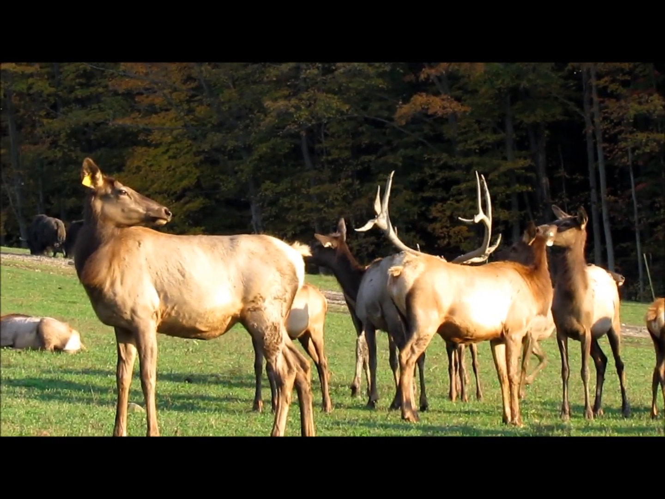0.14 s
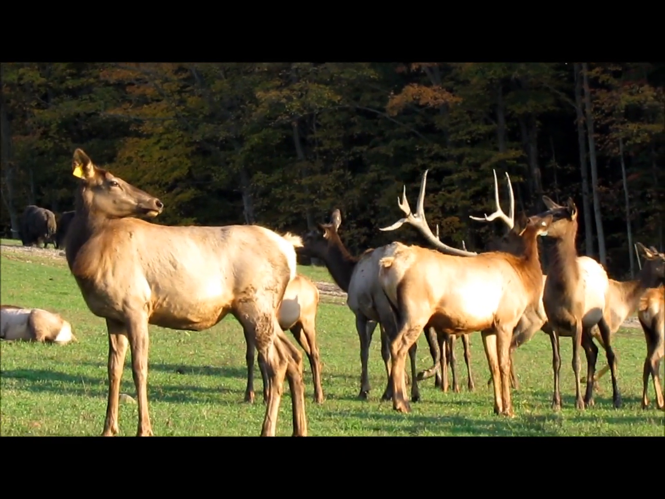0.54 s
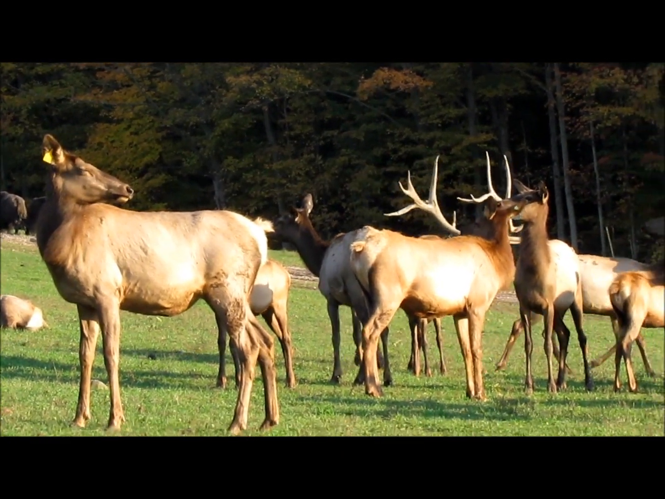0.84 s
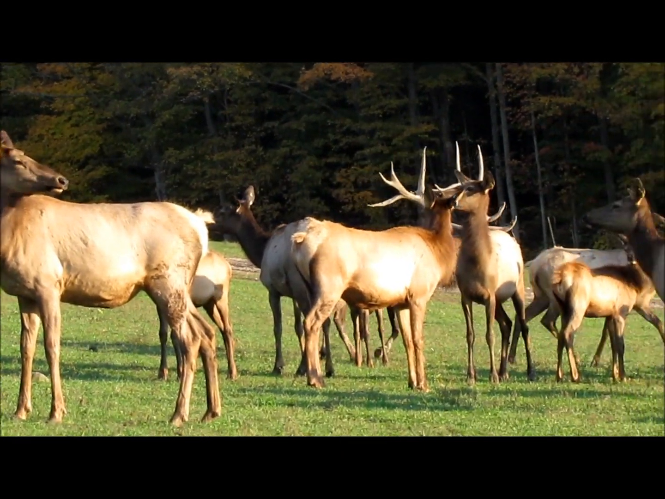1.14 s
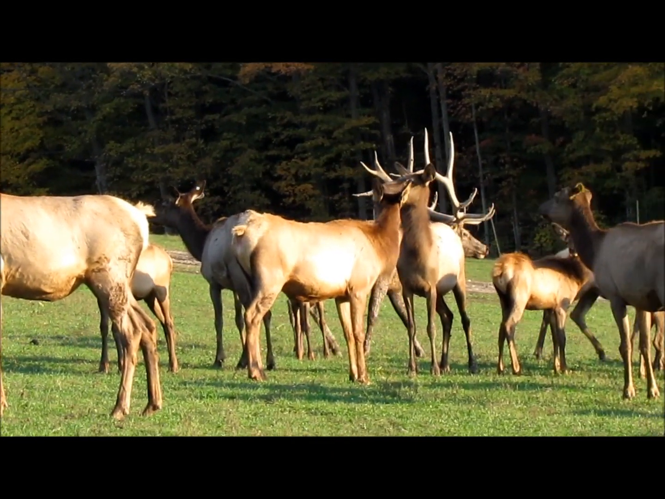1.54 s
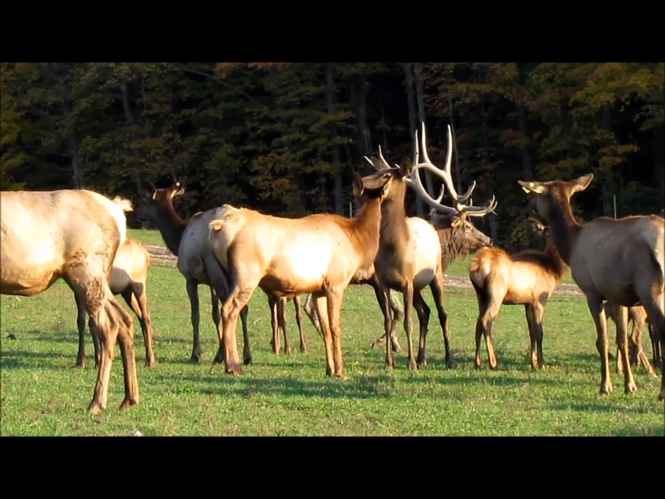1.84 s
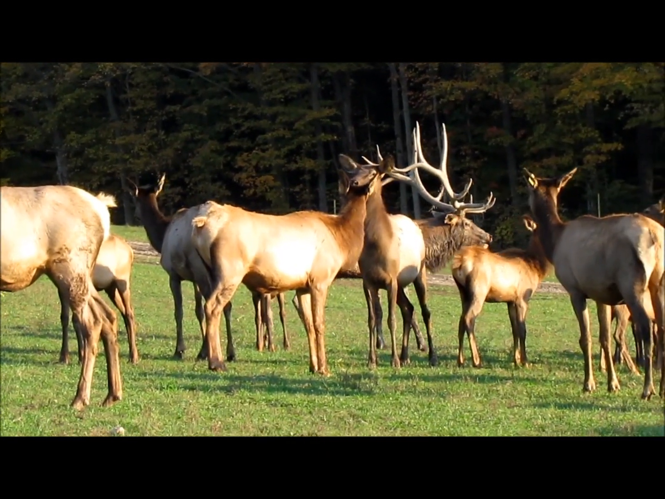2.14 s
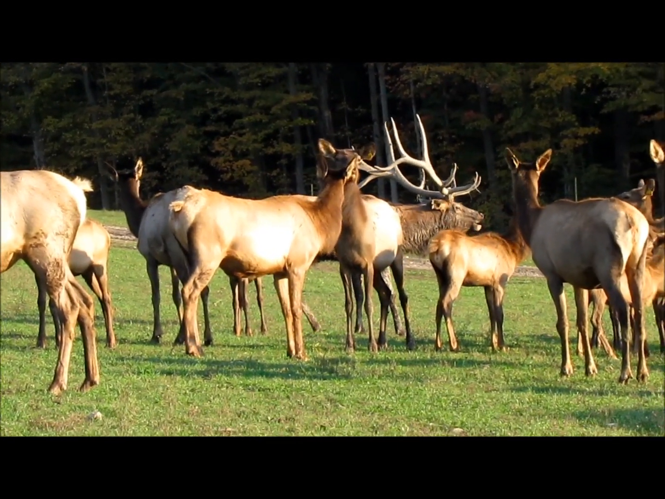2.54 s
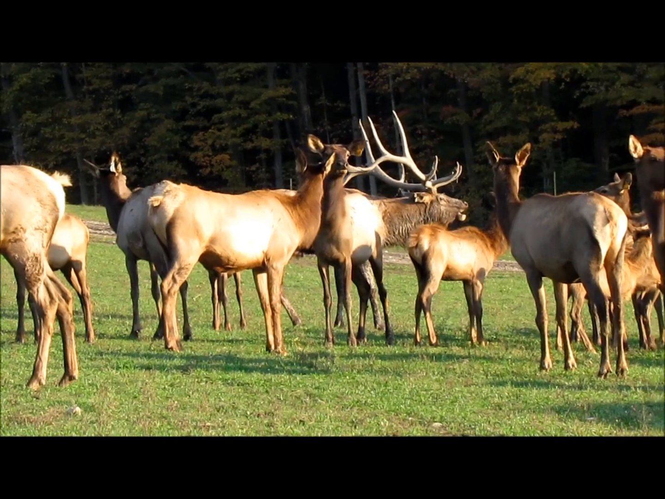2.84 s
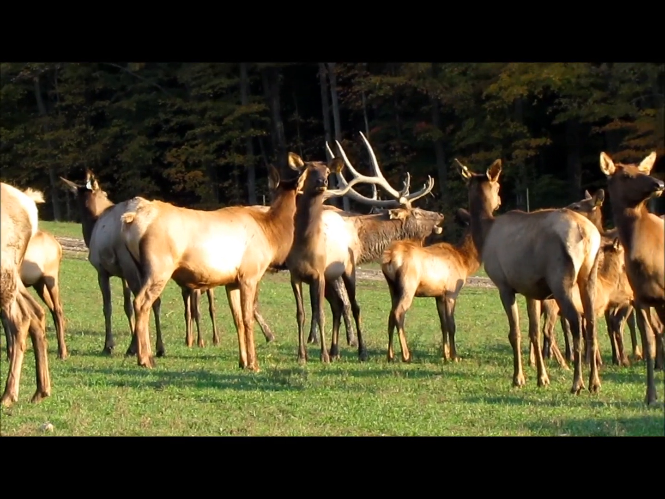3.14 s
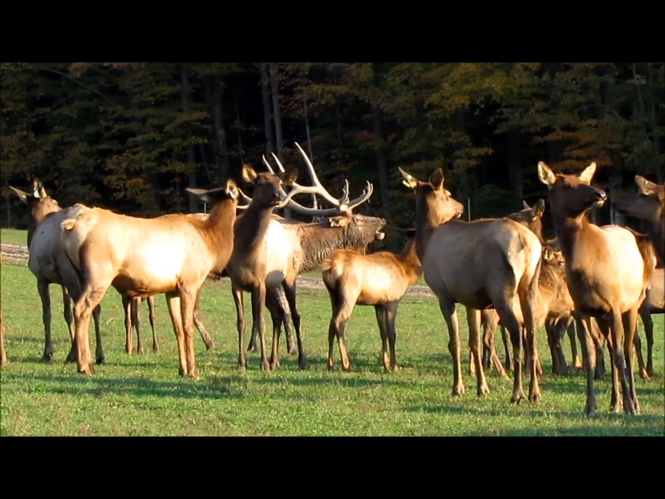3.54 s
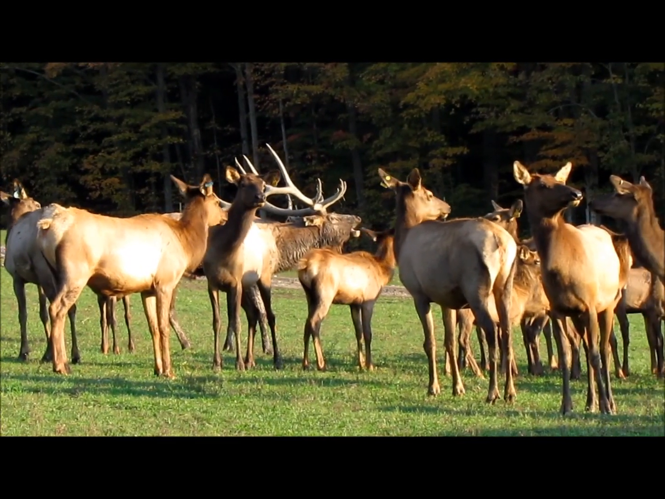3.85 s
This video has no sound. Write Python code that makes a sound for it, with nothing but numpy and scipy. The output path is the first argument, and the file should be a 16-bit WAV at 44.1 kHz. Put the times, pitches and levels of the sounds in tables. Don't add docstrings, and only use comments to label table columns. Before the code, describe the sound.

Elk bull bugling late over quiet, windy field hum, its piercing whistle breaking into a rough roar

```python
import sys
import numpy as np
from scipy import signal
from scipy.fft import rfft, irfft, next_fast_len
from scipy.io import wavfile
from scipy.ndimage import uniform_filter1d, map_coordinates

SR = 44100
rng = np.random.default_rng(int(sys.argv[2]) if len(sys.argv) > 2 else 0)


def persist_wave(psi):
    counts = np.round(np.clip(psi, -1, 1) * 32767).astype(np.int16)
    wavfile.write(sys.argv[1], SR, np.atleast_2d(counts).T)


def field_ratio(decibels):
    return 10 ** (np.asarray(decibels, dtype=float) / 20)


N = 176400
T = np.arange(N) / SR

# freq_hz, density_db
HUM_SPECTRUM = [(35, -39.5), (60, -1), (200, -13), (252, -18), (290, -21), (752, -14), (826, -20),
                (1180, -23), (2500, -41), (3250, -71.5), (5500, -120)]
# time_s, level_db
HUM_SWELL = [(0.0, -47), (1.04, -45), (1.1, -45), (1.79, -47.5), (3.99, -43), (4.0, -42.5)]
# freq_hz, likeness_0_1
HUM_LIKENESS = [(60, .6), (300, .88), (800, .87), (2000, .7)]
# freq_hz, density_db
HISS_SPECTRUM = [(880, -56), (1500, -5.5), (2730, -4), (4730, -7), (5870, -10.5), (8200, -13.5),
                 (15700, -25)]
# time_s, strength_db
WIND_STRENGTH = [(0.0, -62.5), (0.51, -52), (0.96, -60.5), (1.98, -45.5), (2.22, -58), (2.48, -48),
                 (2.68, -57), (2.81, -38), (3.06, -33), (3.1, -42), (3.21, -20.5), (3.25, -37.5),
                 (3.51, -59.5), (4.0, -52)]
# freq_hz, density_db
BUFFET_SPECTRUM = [(15, -9), (40, 2), (100, -4.5), (200, -18.5), (400, -31), (800, -70)]
# time_s, level_db, pitch_hz
THUMPS = [(1.3, -22, 98), (1.957, -23.5, 103), (2.797, -37, 105.7), (2.879, -41, 105.4), (2.949, -12.5, 96),
          (3.04, -27, 106), (3.06, -24, 103.4), (3.129, -21, 104), (3.149, -15.5, 100.7),
          (3.189, -9.5, 103), (3.209, -9.5, 109)]
# freq_hz, density_db
GRASS_SPECTRUM = [(2500, -29), (5000, -16.5), (7500, 0.5), (12000, -1), (16000, -19)]
# centre_s, spread_s, level_db
RUSTLES = [(.2, .03, -72), (.72, .03, -71), (1.01, .008, -69), (1.335, .006, -71), (1.53, .025, -69),
           (1.88, .02, -71), (2.12, .004, -66), (2.3, .04, -71), (2.635, .005, -68), (2.912, .0015, -52)]
# start_s, length_s, pitch_hz, level_db
PEEPS = [(0.385, 0.095, 8050, -64), (.47, .05, 6560, -71), (1.5, 0.043, 6870, -62)]
# time_s, pitch_hz, level_db
FAR_TONE = [(0, 705, -41), (.06, 685, -58), (.15, 668, -44), (.21, 665, -57), (.29, 663, -44),
            (.42, 665, -50.5), (.5, 660, -47), (.63, 655, -55.5), (.75, 650, -57)]
# start_s, length_s, start_hz, end_hz, level_db
FAR_CALLS = [
    (0, .1, 1450, 1450, -56),
    (.14, 0.066, 1434, 1426, -59),
    (.59, 0.074, 1460, 1430, -59),
    (1.04, 0.15, 539, 639, -45),
    (1.16, 0.24, 540, 625, -44),
    (1.44, 0.3, 572.5, 521, -51),
]
# start_s, length_s, start_hz, end_hz, level_db
GRUNT = [
    (2.5, .14, 135.4, 156.6, -40),
    (2.62, 0.25, 192.7, 177.5, -52.5),
]
# time_s, pitch_hz, level_db, octave_db, fold_flutter_0_1
WHISTLE_RISE = [(2.501, 892, -64, -69, 0.5), (2.535, 990, -57, -52.5, 0.65), (2.557, 1107, -44, -53, 0.39),
                (2.568, 1269, -48.5, -54, 0.4), (2.59, 1344, -54.5, -46, 0.5),
                (2.601, 1531, -55, -58.5, 0.4), (2.641, 1595, -65.5, -53, 0.3),
                (2.69, 1686, -49.5, -57.5, 0.2), (2.729, 1745, -62, -59, 0.08),
                (2.785, 1810, -51.5, -56.5, 0), (2.829, 1890, -45, -70, 0), (2.85, 1930, -38, -48, 0),
                (2.876, 1955, -30, -58, 0.01), (2.909, 1950, -25, -58, 0), (2.931, 1939, -23, -41.5, 0),
                (2.97, 1929, -22.5, -42.5, 0.03), (3.058, 1904, -23.5, -43, 0),
                (3.123, 1785, -30.5, -54, 0.23)]
# time_s, pitch_hz
WHISTLE_HELD = [(3.155, 1793), (3.2, 1925), (3.3, 1833), (3.35, 1788), (3.41, 1806), (3.53, 1735),
                (3.6, 1770), (3.85, 1785), (3.95, 1816)]
# time_s, fold_pitch_hz, chopped_whistle_db, its_octave_db, chest_db, third_overtone_db
ROAR = [(3.05, 132.8, -55, -50, -74, -73), (3.13, 132.7, -32.5, -59.5, -63, -80.5),
        (3.2, 130.5, -26, -53, -46.5, -76), (3.31, 116.5, -25.5, -54, -51, -60),
        (3.37, 103.5, -25, -59.5, -52, -39.5), (3.47, 101.2, -26, -66, -41, -43),
        (3.62, 99.2, -22, -73.5, -39, -50), (3.8, 99.95, -21.5, -80, -38.5, -57),
        (4, 98, -20, -75.5, -33.5, -66)]
# centre_hz, width_hz, level_db
TRACT_ONSET = [(1510, 62, -5), (1618, 33, -7.5), (1804, 130, -10), (1905, 125, 0.5), (2340, 170, -26),
               (2495, 200, -31.5), (3180, 130, -39.5)]
# centre_hz, width_hz, level_db
TRACT_STRETCHED = [(1297, 42, -26), (1497, 58, -13), (1650, 140, -18.5), (1844, 117, 4), (2269, 280, -17),
                   (2543, 210, -28), (3150, 130, -34)]
# fold_pitch_multiple, level_db
CHEST = [(1, 1), (2, 2.5), (4, -19.5), (6, -12.5), (7, -29)]
# centre_hz, width_hz, level_db
BREATH_TRACT = [(1840, 220, 2), (2270, 240, 0), (2540, 240, -5), (3150, 160, -17), (6800, 2400, -25),
                (9500, 2400, -30)]
# time_s, level_db
BREATH_LEVEL = [(3.05, -47.5), (3.08, -45.5), (3.13, -54), (3.2, -45.5), (3.25, -48.5), (3.31, -50.5),
                (3.37, -44), (3.47, -49), (3.65, -51.5), (3.8, -44.5), (4, -39.5)]
# start_s, length_s, start_hz, end_hz, level_db
RASP = [(2.8, .35, 2500, 2450, -63), (3.05, .04, 2300, 2300, -49), (3.197, .024, 4250, 4050, -45),
        (3.165, .04, 3950, 4000, -51), (3.197, .024, 2250, 2150, -40), (3.25, 1, 3130, 3130, -60),
        (3.35, 1, 3800, 3800, -60), (3.3, .3, 5050, 5150, -66), (3.3, .2, 6300, 6500, -66),
        (3.6, .35, 5300, 5650, -65), (3.8, .5, 5900, 6250, -60), (3.7, .6, 7350, 7550, -63)]
# time_s, level_db, pitch_hz
HOOF = [(3.955, -28.5, 341.3)]


def unit(x):
    return x / np.sqrt(np.mean(x ** 2) + 1e-20)


def along(points, hz):
    f, v = np.transpose(points)
    return np.interp(np.log(hz + 1), np.log(f + 1), v)


def curves(rows):
    s, *cols = np.transpose(rows)
    return [np.interp(T, s, c) for c in cols]


def wobble(rate_hz):
    knots = rng.standard_normal(int(N * rate_hz / SR) + 4)
    return map_coordinates(knots, [T * rate_hz])


def arch(start_s, length_s, edge_s):
    to_edge_s = np.minimum(T - start_s, start_s + length_s - T)
    return np.sin(np.pi / 2 * np.clip(to_edge_s / edge_s, 0, 1)) ** 2


def phase(hz):
    return 2 * np.pi * np.cumsum(hz) / SR


def filtered(x, response):
    m, tail = next_fast_len(N + SR // 2), SR // 16
    mirror = x[..., ::-1][..., :tail] * np.linspace(1, 0, tail)
    x = np.concatenate([x, mirror], axis=-1)
    return irfft(rfft(x, m) * response(np.fft.rfftfreq(m, 1 / SR)), m)[..., :N]


def resonances(rows):
    def response(f):
        return sum((-1) ** k * field_ratio(db) * 1j * f * w / (c * c - f * f + 1j * f * w)
                   for k, (c, w, db) in enumerate(rows))
    return response


def throat(rows):
    skirt_power = 2.4
    return lambda f: sum(field_ratio(db) * np.abs(resonances([(c, w, 0)])(f)) ** skirt_power for c, w, db in rows)


def rush(spectrum, alike, patchy_db):
    z = signal.stft(rng.standard_normal((2, N)), nperseg=512)[2]
    patches = uniform_filter1d(rng.standard_normal(z.shape[1:]), 6, 0)
    patches = unit(uniform_filter1d(patches, 14, 1))
    pair = signal.istft(z * field_ratio(patchy_db * patches), nperseg=512)[1][:, :N]

    def mid_side(hz):
        turn = np.arccos(np.clip(along(alike, hz), -1, 1)) / 2
        return field_ratio(along(spectrum, hz)) * [np.cos(turn), np.sin(turn)]
    mid, side = filtered(pair, mid_side)
    return unit(np.array([mid + side, mid - side]))


def bands(rows, edge_s, width_hz, waver_hz):
    out = np.zeros(N)
    for s, length, hz0, hz1, db in rows:
        turn = phase(np.interp(T, [s, s + length], [hz0, hz1]) + waver_hz * wobble(8))
        noise = wobble(width_hz) * np.sin(turn) + wobble(width_hz) * np.cos(turn)
        out += field_ratio(db) * arch(s, length, min(edge_s, length / 2)) * noise
    return out


def knocks(rows, cycles):
    out = np.zeros(N)
    for s, db, hz in rows:
        out += field_ratio(db) * np.exp(-2 * ((T - s) * hz / cycles - 1) ** 2) * np.sin(2 * np.pi * hz * (T - s))
    return out


def field():
    swell_db, = curves(HUM_SWELL)
    hum_db = -40 + 0.74 * (swell_db - swell_db.mean()) + 0.91 * wobble(3.6)
    hum = field_ratio(hum_db) * rush(HUM_SPECTRUM + [(6000, -65)], HUM_LIKENESS, patchy_db=0.0)
    hum = hum * field_ratio([[-1.2], [1.2]])
    hum[1] = np.roll(hum[1], 2)
    hiss = rush([(700, -1.3)] + HISS_SPECTRUM, [(2000, 0.13), (8000, 0.059)], patchy_db=1.48)
    return hum + field_ratio(-57 + 0.3 * wobble(7.7)) * hiss * field_ratio([[4.3], [1.1]])


def wind():
    gust_top_db = -41
    strength_db, = curves(WIND_STRENGTH)
    lumps = rush(BUFFET_SPECTRUM, [(30, 0.6)], patchy_db=2.5)
    lumps = unit(field_ratio(np.array([wobble(42), wobble(22)])) * lumps)
    thumps = -knocks(THUMPS, cycles=0.65)
    left = field_ratio(-45 + 0.39 * (strength_db - strength_db.mean())) * lumps[0] + field_ratio(-34) * thumps
    right = field_ratio(np.minimum(strength_db, gust_top_db) + 13) * lumps[1] + thumps
    return np.array([left, right])


def grass():
    shape = sum(field_ratio(db) * np.exp(-((T - s) / spread) ** 2) for s, spread, db in RUSTLES)
    grain = field_ratio(3.5 * wobble(298.2))
    return shape * grain * rush(GRASS_SPECTRUM, [(5000, .4)], patchy_db=-3.5) * field_ratio([[2.5], [-1.5]])


def bird():
    out = np.zeros(N)
    for s, length, hz, db in PEEPS:
        tone = np.sin(2 * np.pi * hz * T + .8 * wobble(51.6))
        out += field_ratio(db + 4 * wobble(60)) * arch(s, length, .015) * tone
    return out


def far_herd():
    hz, db = curves(FAR_TONE)
    tone = np.sqrt(2) * field_ratio(db + 2.1 * wobble(34.7)) * arch(-0.91, 2.0, .05)
    tone = tone * np.sin(phase(hz + 7 * wobble(41.6)))
    chirps = bands(FAR_CALLS[:3], .03, 39.8, waver_hz=4.6)
    lows = bands(FAR_CALLS[3:], 0.044, 110, waver_hz=20)
    return tone + chirps + lows


def echo(x):
    t = np.arange(SR // 2) / SR
    tail = rng.standard_normal((2, len(t))) * field_ratio(-60 * t / 1.1) * (t > .006)
    return signal.fftconvolve(x[None], tail / np.linalg.norm(tail[0]), axes=1)[:, :N]


def clean_whistle(whistle, hz, weak, fold):
    edge_s = 0.049
    start_s, end_s = WHISTLE_RISE[0][0], WHISTLE_RISE[-1][0]
    _, level_db, octave_db, flutter = curves(WHISTLE_RISE)
    crack = .028 * arch(3.02, .05, 0.005) * wobble(260)
    fast = 2 * np.pi * 600 * T
    gate = arch(start_s - edge_s, end_s - start_s + 2 * edge_s, edge_s)
    gate = gate * (1 + flutter * np.cos(fold)) * field_ratio(4 * weak * wobble(120))
    twelfth = 0.38 * np.clip((1400 - hz) / 200, 0, 1) * np.sin(3 * whistle)
    first = np.sin(whistle) + crack * (np.sin(whistle + fast) + 0.19 * np.sin(whistle - fast))
    second = np.sin(2 * whistle) + twelfth + 5 * crack * np.sin(2 * whistle + fast)
    return gate * np.sqrt(2) * (field_ratio(level_db) * first + field_ratio(octave_db) * second)


def chopped_whistle(whistle, fold):
    slope, sweep_rad, blur_rad, shimmer_db = 0.28, .33, .3, 1.2
    blur = {k: blur_rad * max(abs(k - .5) - 1, 0) * (1 if k > 0 else .8) * wobble(70) for k in range(-7, 12)}

    def comb(turn):
        shimmer = field_ratio(shimmer_db * wobble(90))
        return shimmer * sum((.5 + abs(k - .5)) ** -slope
                             * np.sin(turn + k * fold - sweep_rad * (k - .5) ** 2 + blur[k]) for k in blur)

    lines = comb(whistle)
    stretch = np.clip((T - 3.33) / 0.25, 0, 1)
    core = (1 - stretch) * filtered(lines, throat(TRACT_ONSET))
    core = core + stretch * filtered(lines, throat(TRACT_STRETCHED))
    core = core / np.sqrt(np.abs(uniform_filter1d(core ** 2, size=SR // 16)) + 1e-9)
    octave = filtered(comb(2 * whistle), lambda f: np.abs(resonances([(3850, 380, 0)])(f)) ** 2)
    return core, unit(octave)


def bugle():
    fold_hz, roar_db, roar_octave_db, chest_db, third_db = curves(ROAR)
    hz, = curves([r[:2] for r in WHISTLE_RISE] + WHISTLE_HELD)
    breath_db, = curves(BREATH_LEVEL)
    on = arch(ROAR[0][0], 2, 0.049)
    weak = np.clip((1750 - hz) / 300, .3, 1) * (T < 2.86)
    hz = hz + 300 * np.exp(-((T - 3.209) / .005) ** 2)
    slip_hz = 17 * np.clip((T - 3.2) / 0.15, .3, 1) * wobble(80)
    jitter_hz = (2.84 + 32 * weak ** 2) * wobble(90)
    whistle = phase(hz + on * (10 * wobble(25) + slip_hz) + jitter_hz)
    fold = phase(fold_hz * (1 + .011 * wobble(30)))

    core, octave = chopped_whistle(whistle, fold)
    chest = sum(field_ratio(db + 1.8 * wobble(30)) * np.sin(k * fold) for k, db in CHEST)
    third = field_ratio(third_db + 1.5 * wobble(25)) * np.sin(3 * fold)
    roar = field_ratio(roar_db) * core + field_ratio(roar_octave_db) * octave + field_ratio(chest_db) * chest + third
    puffs = (1 + 0.56 * np.cos(fold - 1.5)) * rng.standard_normal(N)
    breath = unit(filtered(puffs, throat(BREATH_TRACT)))
    rasp = (1 + .6 * np.cos(fold)) * bands(RASP, .12, 240, waver_hz=20)
    grunt = bands(GRUNT, 0.013, 14, waver_hz=1.95)
    return clean_whistle(whistle, hz, weak, fold) + rasp + grunt + on * (roar + field_ratio(breath_db) * breath)


def scene():
    background = field() + wind() + grass() + bird() + far_herd() * field_ratio([[-1.2], [1.2]])
    call = bugle() + knocks(HOOF, cycles=1.75)
    near = np.array([call, np.pad(call, (1, 0))[:N]]) * field_ratio([[-1.5], [1.3]])
    return background + near + field_ratio(-16) * echo(call)


def top_cut(x):
    return signal.sosfilt(signal.butter(12, 15820, fs=SR, output="sos"), x)


def record(dry):
    top_hz, fade_s = 15730, .004
    faded = dry * arch(-1, 1 + N / SR, fade_s)
    mix = filtered(faded, lambda hz: hz < top_hz)
    return top_cut(mix)


dry = scene()
out = record(dry)
persist_wave(out)
```